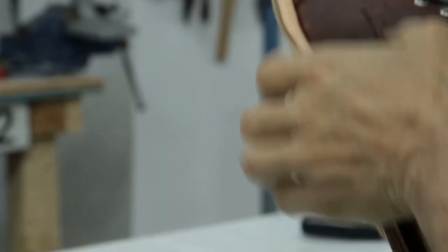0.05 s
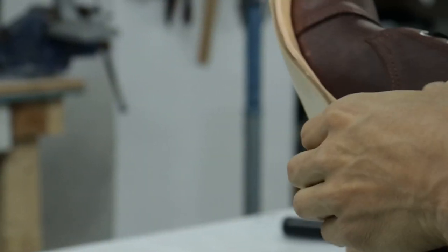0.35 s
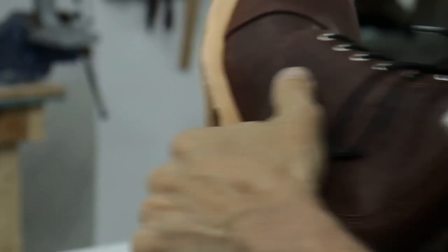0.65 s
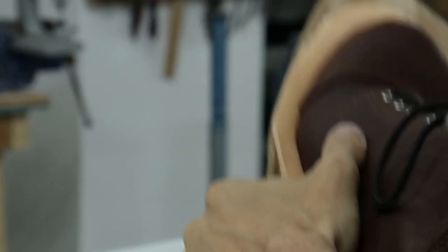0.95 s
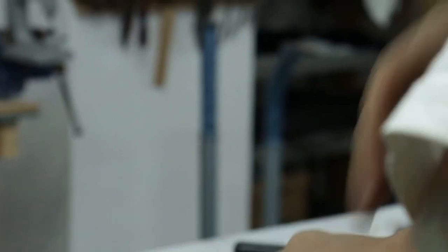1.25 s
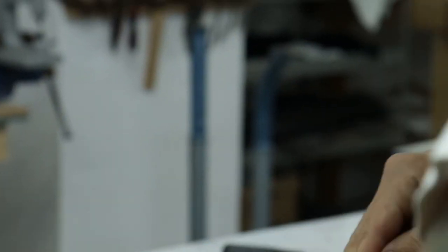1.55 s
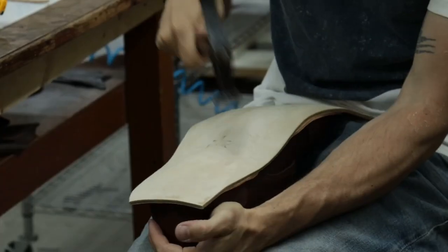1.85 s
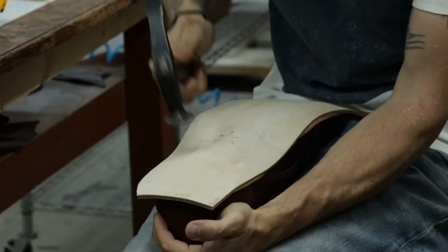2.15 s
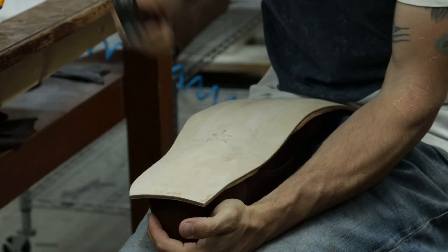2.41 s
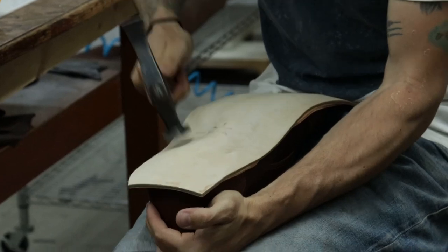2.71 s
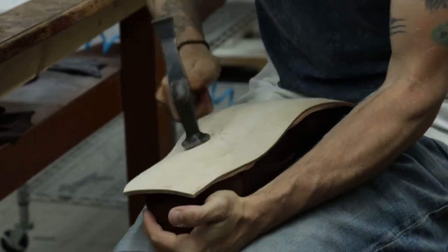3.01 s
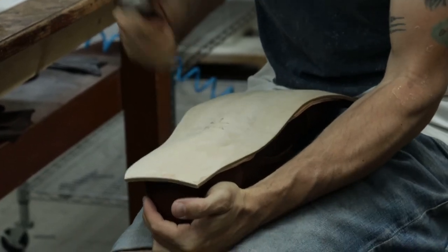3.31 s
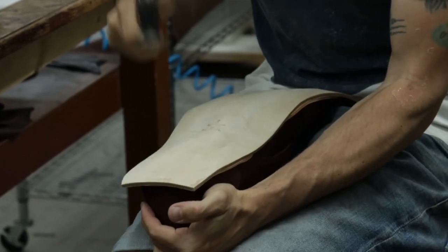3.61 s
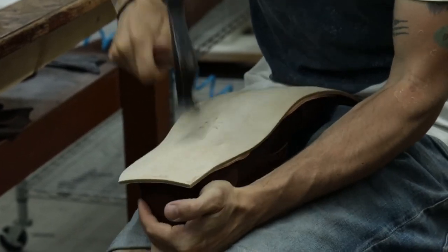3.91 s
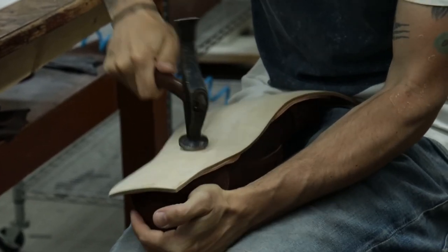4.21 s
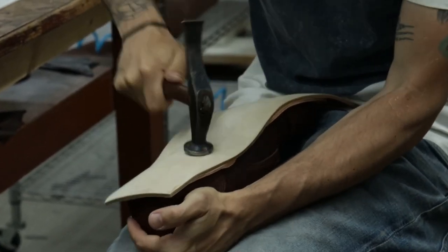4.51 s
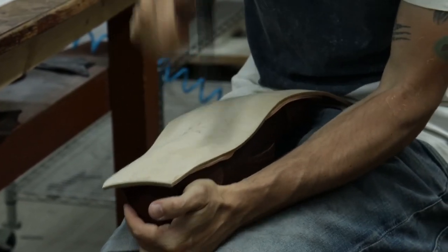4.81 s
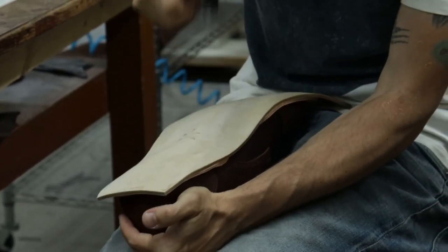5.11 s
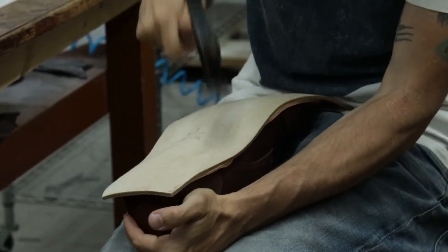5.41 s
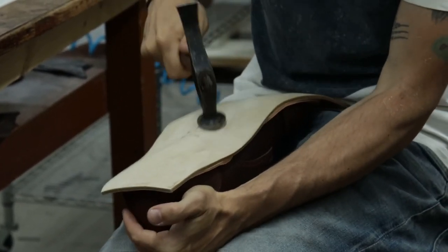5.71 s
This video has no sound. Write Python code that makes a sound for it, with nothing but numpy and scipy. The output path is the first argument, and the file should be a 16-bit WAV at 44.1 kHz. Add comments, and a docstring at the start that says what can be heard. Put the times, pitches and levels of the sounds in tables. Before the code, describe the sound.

A faint machine whine and soft room air open the scene in a hard-walled workshop. Close to the microphone, hands quietly turn a boot over: a few light finger knocks and a hollow rumble at the start, palms rubbing on leather, and a brief snap of a lace tip at 0.6 seconds. More rubbing and a cluster of small knocks follow from about 0.9 to 1.5 seconds. At 1.6 seconds the whine and air drop abruptly to near silence, and at 1.7 a hammer strikes the leather sole once, loudly. A soft touch on the boot comes at about 2.2 seconds. From 2.6 to about 6 seconds, ten blows land evenly, a little under three per second. Each combines a thump, a slap and a sharp crack, overloads the microphone and reverberates for about half a second. The last few have less thump and more slap.

```python
"""A machine whines faintly while a shoemaker turns a boot over: palms rub, the boot rumbles, fingers knock,
a lace tip snaps. The background drops abruptly, and he hammers the leather sole on his lap: one blow,
a pause with a soft touch, then an even run of ten. Each impact excites the damped modes of boot and sole,
a thump and a slap topped by a crack of noise. The blows overload the close microphone and reverberate
through the hard-walled workshop."""
import sys
import numpy as np
from scipy import signal
from scipy.fft import rfft, irfft
from scipy.io import wavfile
from scipy.ndimage import uniform_filter1d

SR = 44100
rng = np.random.default_rng(int(sys.argv[2]) if len(sys.argv) > 2 else 0)


def dump(signal):
    """Clip the signal to [-1, 1] and save it as 16-bit WAV at the path in sys.argv[1]."""
    limited = np.clip(np.atleast_2d(signal).T, -1, 1)
    pcm = np.round(limited * 32767).astype(np.int16)
    wavfile.write(sys.argv[1], SR, pcm)


N = 262395


def from_db(db):
    """Amplitude ratio of a level in decibels."""
    return 10 ** (np.asarray(db) / 20)


def seconds(size):
    """Time of each sample."""
    return np.arange(size) / SR


def hertz(size):
    """Frequency of each Fourier bin, at least 1 Hz."""
    return np.maximum(np.fft.rfftfreq(size, 1 / SR), 1)


def at_hz(points, hz):
    """Interpolation on a logarithmic frequency axis."""
    freqs, values = np.transpose(points)
    return np.interp(np.log(hz), np.log(freqs), values)


def decay(t, t60):
    """Exponential damping: 60 dB down after t60 seconds."""
    return np.exp(-np.log(1000) * t / t60)


def swell(start, length, attack, t60):
    """Envelope: a linear rise, a hold to the end of its length, an exponential decay."""
    t = seconds(N) - start
    return np.clip(t / attack, 0, 1) * decay(np.maximum(t - length, 0), t60)


def colour(spectrum, size):
    """Magnitude response normalised to a mean power of 1."""
    gain = from_db(at_hz(spectrum, hertz(size)))
    return gain / np.sqrt(np.mean(gain ** 2))


def noise(spectrum, size):
    """Spectrally shaped Gaussian noise of rms 1."""
    return irfft(rfft(rng.standard_normal(size)) * colour(spectrum, size), size)


def ring(hz, t60, size):
    """Impulse response of one mode: a damped sinusoid."""
    t = seconds(size)
    return np.sin(2 * np.pi * hz * t) * decay(t, t60)


def add(track, start_s, sound):
    """Superposition: a sound joins the track at its start time."""
    start = min(max(round(start_s * SR), 0), N)
    track[:, start:start + sound.shape[1]] += sound[:, :N - start]


def before_hush(hush_s=1.615, fade_s=0.01):
    """Gate that falls from 1 to 0 just before the first blow."""
    return np.clip((hush_s - seconds(N)) / fade_s, 0, 1)


def machine_and_air(busy_db=-62.5, quiet_db=-76.5):
    """Partials over noise: just before the first blow, whine and louder air drop to a low noise floor."""
    # Partials of the whine. Each row: frequency in Hz, rms level in dB.
    partials = [(598, -65), (1319, -71.5), (1680, -74), (2762, -80.5), (3978, -94)]
    # Spectrum of the room air. Each row: frequency in Hz, spectral density in dB.
    air = [(25, 7.5), (80, 12), (130, 0), (330, 2.5), (700, -2.5), (1400, -0.5), (2300, -7), (5700, -16.5),
           (8200, -13), (10500, -24.5), (16000, -29)]
    t, gate = seconds(N), before_hush()
    whine = sum(np.sqrt(2) * from_db(db) * np.sin(2 * np.pi * (hz * t + rng.random()))
                for hz, db in partials)
    return (from_db(quiet_db) + gate * from_db(busy_db)) * noise(air, N) + gate * whine


def rub_and_rumble(grain_db=2.0):
    """Stick-slip friction: palms slide on leather and the boot shifts hollowly, both as grainy noise."""
    # Strokes of the palms. Each row: start in seconds, length in seconds, level in dB.
    rubs = [(0.0, 0.18, -64), (.44, 0.21, -62.5), (0.937, .34, -56.5), (1.366, 0.11, -55)]
    # Shifts of the boot. Each row: start in seconds, level in dB.
    shifts = [(0.016, -47.5), (.212, -58.5), (1.605, -68.5), (2.249, -54.5)]
    # Spectra of rub and rumble. Each row: frequency in Hz, spectral density in dB.
    rub_colour = [(60, -5), (250, -7), (600, 6.5), (1200, -1.5), (2500, -3), (5000, -6), (9000, -21),
                  (16000, -29)]
    rumble_colour = [(30, -1), (130, -10), (270, 4), (450, -3), (800, -32), (3000, -37), (8000, -63)]
    rubbing = sum(from_db(db) * swell(s, length, attack=0.096, t60=0.75) for s, length, db in rubs)
    shifting = sum(from_db(db) * swell(s, length=0.025, attack=0.0057, t60=0.47) for s, db in shifts)
    grain = uniform_filter1d(rng.standard_normal(N), size=160)
    sliding = before_hush() * rubbing * noise(rub_colour, N) + shifting * noise(rumble_colour, N)
    return from_db(grain_db * grain / grain.std()) * sliding


def strike(modes, crack, crack_db, crack_t60, facing_db=0, room_db=0, size=4096):
    """Impact: free vibration of modes (Hz, dB, t60 in seconds), a noise burst, and their reverberation."""
    rings = [(-1) ** k * from_db(db) * ring(hz, t60, size) for k, (hz, db, t60) in enumerate(modes)]
    burst = from_db(crack_db) * decay(seconds(size), crack_t60)
    # the room gathers sound from all directions, so there the parts add in power
    power = sum(np.abs(rfft(r)) ** 2 for r in rings) + colour(crack, size) ** 2 * np.sum(burst ** 2)
    sound = from_db(room_db) * workshop(hertz(size), np.sqrt(power))
    # directivity: a surface that faces away sends less crack straight to the microphone
    sound[:, :size] += sum(rings) + from_db(facing_db) * burst * noise(crack, size)
    return sound


def finger_knocks(t60=0.04, tick_db=-0.5, cutoff_ratio=5.5):
    """A soft contact acts as a low-pass filter: it excites little above a few times its own pitch."""
    # Touches on boot and sole. Each row: start in seconds, pitch in Hz, level in dB.
    knocks = [(.023, 940, -43), (.039, 1140, -42), (.054, 1050, -35.5), (.216, 970, -45),
              (.993, 630, -41.5), (1.068, 680, -45), (1.100, 810, -42.5), (1.131, 604, -43.5),
              (1.185, 790, -41.5), (1.205, 1126, -41), (1.239, 476, -42.5), (2.252, 334, -48)]
    # Spectrum of the contact's tick. Each row: frequency in Hz, spectral density in dB.
    tick = [(100, -22.5), (400, -0.5), (1100, 2), (2500, -8), (5000, -18), (9000, -29), (16000, -50)]
    out = np.zeros((2, N))
    for start_s, hz, db in knocks:
        knock = strike([(hz, db, t60)], tick, db + tick_db, t60, room_db=-2.5)
        softness = signal.butter(2, min(cutoff_ratio * hz, SR / 3), fs=SR, output="sos")
        add(out, start_s, signal.sosfilt(softness, knock))
    return out


def workshop(source_hz, source_gain, build_s=0.0016, linger_ratio=2.27, size=36864):
    """Reverberation at two capsules: a diffuse field builds and decays by band; standing waves boom."""
    # Coherence between the capsules. Each row: frequency in Hz, correlation from 0 to 1.
    coherence = [(200, 1), (600, 0.57), (1500, 0.28), (16000, 0.9)]
    # Strength of the diffuse field. Each row: frequency in Hz, gain in dB.
    room_gain = [(50, -11.5), (150, -9.5), (300, -6), (420, 1), (650, 2), (1500, 0), (4000, 4.5),
                 (12000, 4.5)]
    # Reverberation times. Each row: band centre in Hz, t60 in seconds.
    room_t60 = [(60, 0.3), (260, 0.68), (700, 0.62), (1800, 0.53), (4800, 0.48), (8000, 0.48),
                (14000, 0.34)]
    # Slower tail from the far end. Each row: frequency in Hz, level in dB relative to the main tail.
    linger = [(200, -42), (700, -24.5), (5000, -14), (9000, -35)]
    # Standing waves. Each row: frequency in Hz, gain at resonance in dB, t60 in seconds.
    room_modes = [(205.5, -2.5, 0.61), (271, 6, 0.61), (326.2, 7.5, 0.44), (388, 7.5, 0.58),
                  (465, 6.5, 0.61), (489, 6, 0.28)]
    t, hz = seconds(size), hertz(size)
    alike = np.clip(at_hz(coherence, hz), 0, 1)
    mid, side = rfft(rng.standard_normal((2, size)))
    field = np.sqrt((1 + alike) / 2) * mid + np.sqrt((1 - alike) / 2) * side * [[1], [-1]]
    field = field * np.interp(hz, source_hz, source_gain) * from_db(at_hz(room_gain, hz))
    centres, t60s = np.transpose(room_t60)
    build = 1 - np.exp(-t / build_s)
    tail = np.zeros((2, size))
    for band_weights, t60, linger_db in zip(np.eye(len(centres)), t60s, at_hz(linger, centres)):
        band = irfft(field * np.interp(hz, centres, band_weights), size)
        envelope = build * (decay(t, t60) + from_db(linger_db) * decay(t, linger_ratio * t60))
        tail += band * envelope / np.sqrt(np.sum(envelope ** 2))
    for mode_hz, db, t60 in room_modes:
        drive = np.interp(mode_hz, source_hz, source_gain) * 2 * np.log(1000) / (t60 * SR)
        tail += rng.choice([-1, 1]) * drive * from_db(db) * ring(mode_hz, t60, size)
    return tail


def lace_snap(start_s=0.5998):
    """A brief impact has a broad spectrum: a lace tip hits the boot in one burst of noise."""
    # Spectrum of the snap. Each row: frequency in Hz, spectral density in dB.
    snap = [(400, -13.5), (1200, -8), (1750, 0), (2600, -3.5), (4500, -5.5), (8000, -16.5), (16000, -33.5)]
    out = np.zeros((2, N))
    add(out, start_s, strike([], snap, crack_db=-27, crack_t60=0.0057, facing_db=1.5))
    return out


def hammer(spot_t60=0.04, clack_t60=0.0098, sag_octaves=0.24, stiffening=1.6, tilt_db_per_octave=-1):
    """Modal excitation by steel on leather: the boot thumps, the sole slaps, its surface cracks."""
    # Blows. Each row: start in seconds, force in dB, give from 0 (firm on the last) to 1 (loose),
    # pitch of the struck spot in Hz, pitch of its clack in Hz, roll-off of the crack in Hz.
    blows = [(1.6681, -0.85, 1.0, 598, 1030, 10100), (2.5832, 0.34, 0.19, 488, 1390, 12100),
             (2.9809, 2, 0.091, 479, 1300, 13400), (3.3553, 1.1, 0.038, 557, 2000, 8900),
             (3.729, .5, 0.033, 564, 1850, 7840), (4.0975, -0.64, 0.094, 515, 990, 7950),
             (4.4652, -0.9, 0.035, 332, 980, 14300), (4.8374, 0.16, 0.43, 543, 1480, 13000),
             (5.2056, 2, 0.77, 501, 2490, 19000), (5.5708, -2.5, 0.52, 537, 1420, 14500),
             (5.9423, -1.4, 0.91, 506, 1550, 12500)]
    # Modes of the whole boot, from its bounce on the lap upward, and of the leather sole.
    # Each row: frequency in Hz, relative level in dB, t60 in seconds.
    body = [(48, -24, 0.24), (281, -8, 0.029), (370.3, -1.5, 0.037)]
    sole = [(645, -2.5, 0.022), (847, -0.5, 0.013), (1077, -6.5, 0.025), (1315, -0.5, 0.0099),
            (1613, -11, 0.026), (2130, -13, 0.003)]
    # Crack spectrum before tilt and roll-off. Each row: frequency in Hz, spectral density in dB.
    crack_colour = [(500, 3.5), (1000, 4), (1900, 7.5), (3000, -1.5), (5000, -6), (8000, -13),
                    (12000, -19.5), (16000, -24.5)]
    out = np.zeros((2, N))
    for start_s, force_db, give, spot_hz, clack_hz, rolloff_hz in blows:
        # a loose place passes less to the boot, lowers its thump and sounds more itself
        body_db = -3 + force_db - 13.5 * give
        spot_db = -13 + force_db + 6.5 * give
        slap_db = -11.5 + force_db + 5 * give
        sag = 2 ** (-sag_octaves * give)
        # leather stiffens under load, so clack and crack grow faster than the force
        clack_db = -11.5 + stiffening * force_db
        crack_db = -14 + stiffening * force_db
        modes = [(hz * sag, db + body_db, t60) for hz, db, t60 in body]
        modes += [(spot_hz, spot_db, spot_t60)]
        modes += [(hz, db + slap_db, t60) for hz, db, t60 in sole]
        modes += [(clack_hz, clack_db, clack_t60)]
        # every crack is tilted slightly darker; each blow's roll-off rounds off the top
        crack = [(hz, db + tilt_db_per_octave * np.log2(hz) - 10 * np.log10(1 + (hz / rolloff_hz) ** 6))
                 for hz, db in crack_colour]
        add(out, start_s, strike(modes, crack, crack_db, crack_t60=0.03, facing_db=-2.0))
    return out


def microphone(pair, overload_db=-22, knee=6.2, asymmetry=0.071):
    """Asymmetric saturation: each capsule flattens the peaks, then the two are averaged to one channel."""
    ceiling = from_db(overload_db) * (1 + asymmetry * np.sign(pair))
    flattened = pair / (1 + np.abs(pair / ceiling) ** knee) ** (1 / knee)
    return flattened.mean(axis=0, keepdims=True)


def scene():
    """The pressures of all sources add at the close microphone."""
    return microphone(hammer() + finger_knocks() + lace_snap() + rub_and_rumble() + machine_and_air())


def record(dry, droop_hz=170, low_cut_hz=24, high_cut_hz=16200):
    """Band limiting: thinned bass makes the flattened peaks sag, and a steep low-pass cuts the top."""
    bass = signal.sosfilt(signal.butter(1, droop_hz, fs=SR, output="sos"), dry)
    thin = signal.sosfilt(signal.butter(2, low_cut_hz, "high", fs=SR, output="sos"), dry - bass)
    return signal.sosfilt(signal.ellip(10, 0.1, 80, high_cut_hz, fs=SR, output="sos"), thin)


dry = scene()
out = record(dry)
dump(out)
```